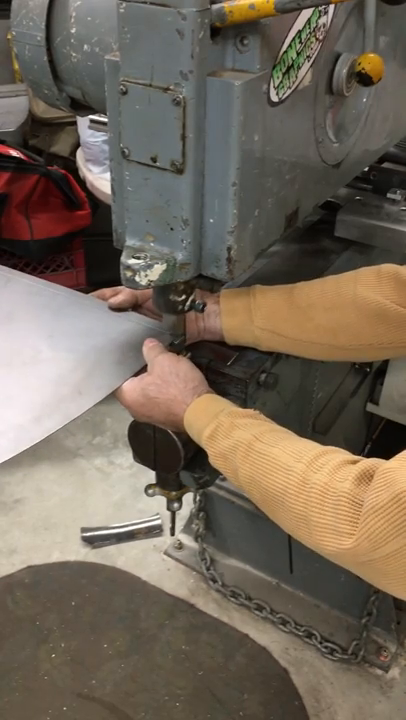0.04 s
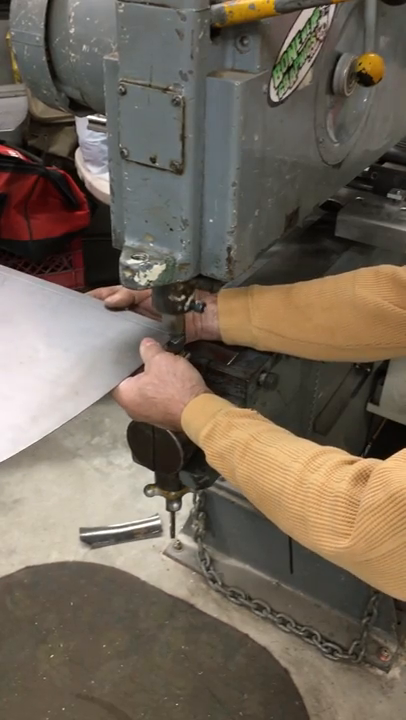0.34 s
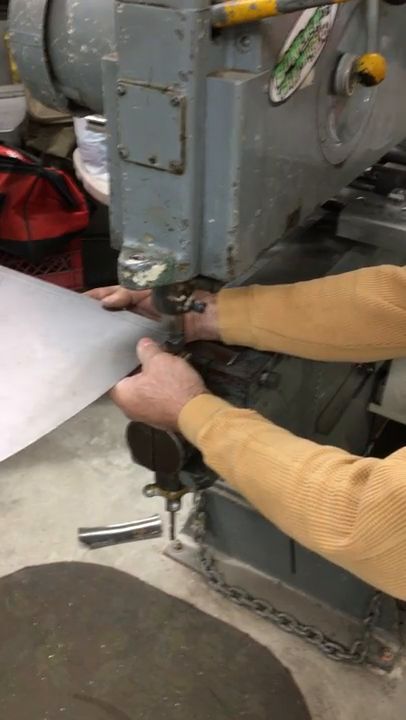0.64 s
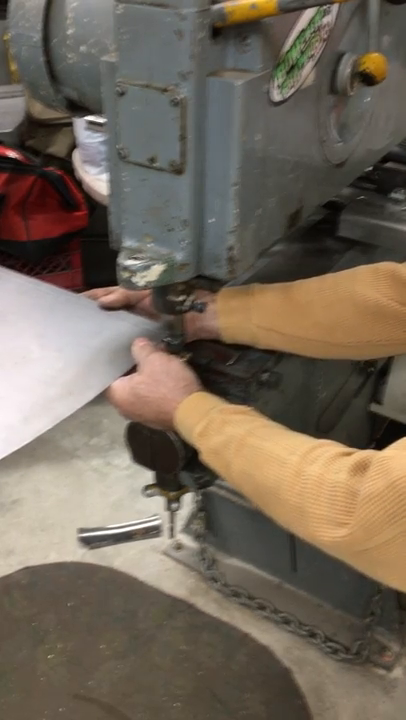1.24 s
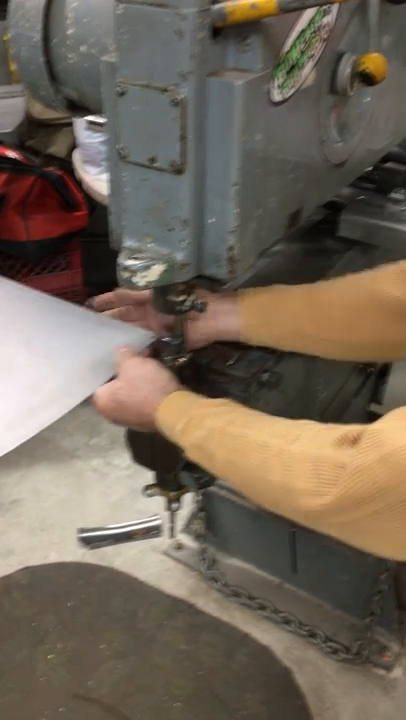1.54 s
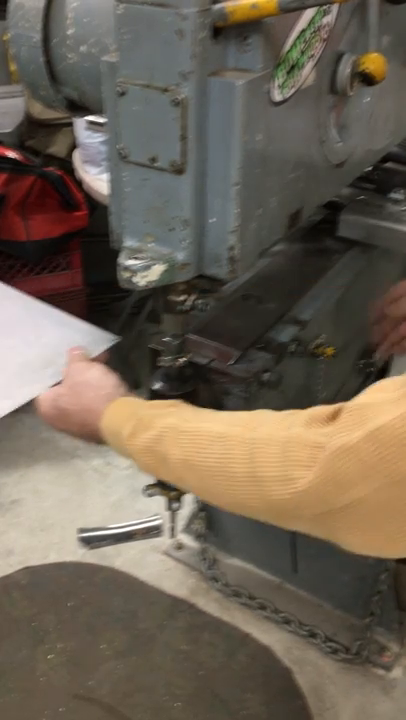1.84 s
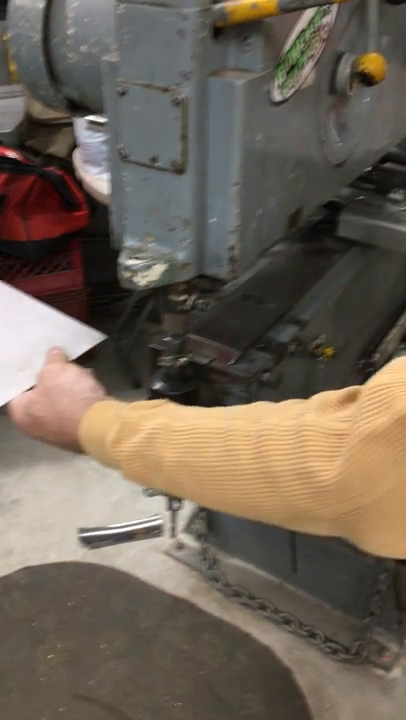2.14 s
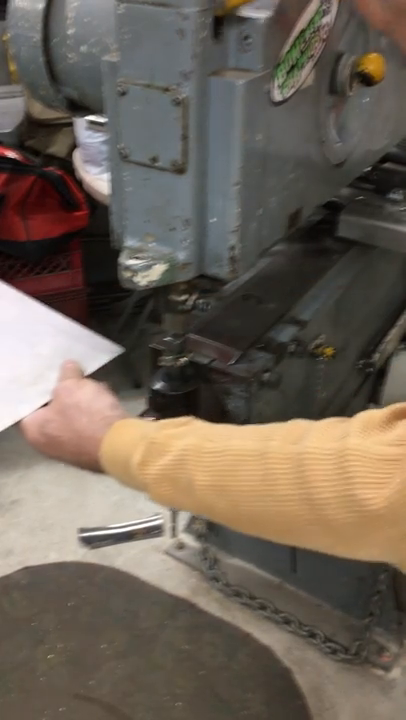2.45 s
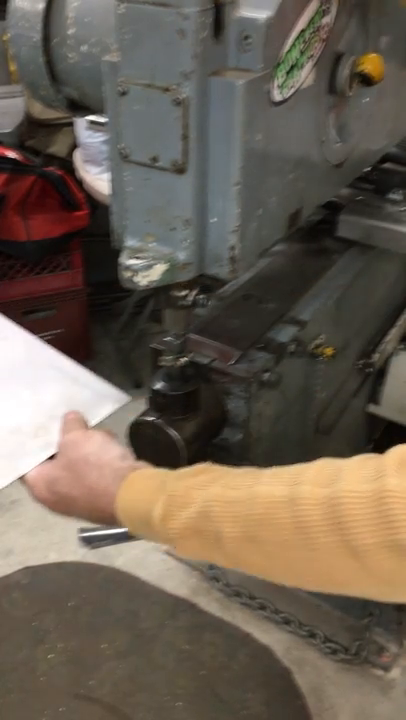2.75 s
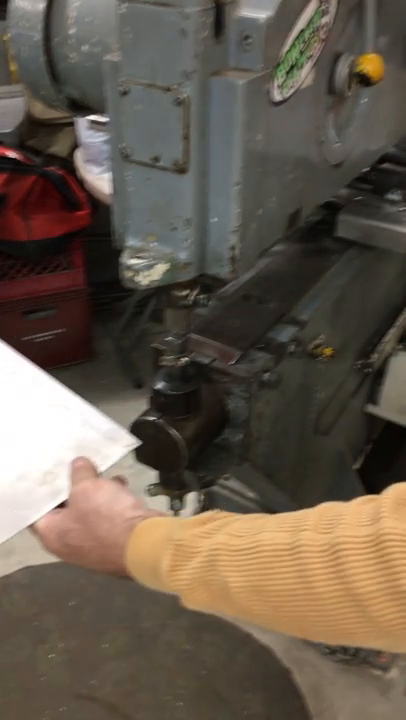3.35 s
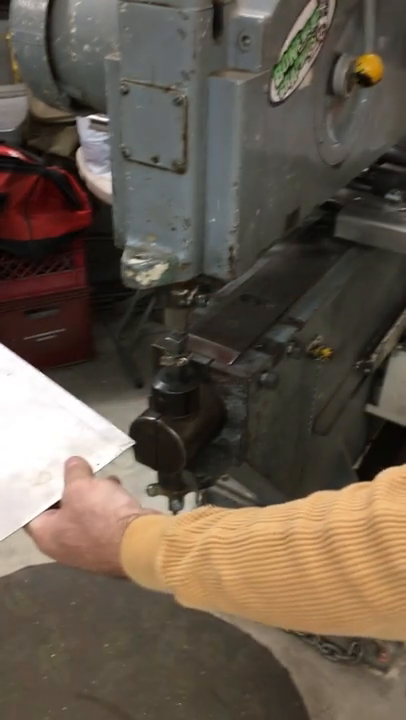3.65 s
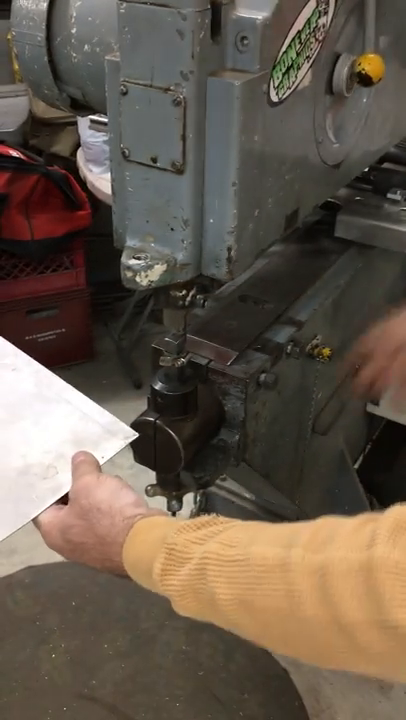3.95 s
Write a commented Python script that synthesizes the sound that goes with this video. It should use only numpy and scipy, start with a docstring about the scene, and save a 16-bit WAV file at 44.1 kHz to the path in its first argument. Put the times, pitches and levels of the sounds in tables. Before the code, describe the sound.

A metal-forming machine hammers very rapidly on a droning, rattling metal sheet in a workshop. The hammering fades to a quiet motor hum and hiss, then the free tool clatters and buzzes until a sharp knock near the end.

```python
"""A metal-forming machine runs at thirty strokes a second in a workshop, over its motor's hum and hiss.
First its tool hammers a sheet panel, which drones and rattles less and less as it is drawn out.
From 1.4 s the machine idles. At 2.4 s the free tool starts to clatter and makes the frame buzz,
and a few dull bumps follow. After one sharp knock at 3.6 s the motor coasts down and its hum stops."""
import sys
import numpy as np
from scipy import signal
from scipy.fft import rfft, irfft
from scipy.io import wavfile

SR = 44100
rng = np.random.default_rng(int(sys.argv[2]) if len(sys.argv) > 2 else 0)


def waveform_to_disk(signal):
    """Save audio, clipped to [-1, 1], as 16-bit WAV at the path in sys.argv[1]."""
    frames = np.transpose(np.atleast_2d(signal))
    scaled = np.clip(frames, -1, 1) * 32767
    samples = np.round(scaled).astype(np.int16)
    wavfile.write(sys.argv[1], SR, samples)


N = 176400
TIME = np.arange(N) / SR
CUTOFF_HZ = 15900


def amp(db):
    """Turn decibels into a gain to multiply by."""
    return 10 ** (np.asarray(db) / 20)


def unit(x):
    """Scale a sound to an average (rms) size of 1."""
    return x / np.sqrt(np.mean(x ** 2) + 1e-20)


def curve(rows, times=TIME):
    """Join a table's (time, value) points with straight lines."""
    return np.interp(times, *np.transpose(rows))


def level_at(spectrum, hz):
    """Read a spectrum's level in dB at the given frequencies."""
    points_hz, db = np.transpose(spectrum)
    return np.interp(np.log(hz + 1e-3), np.log(points_hz), db)


def colour(x, spectrum, peaks=()):
    """Give a sound a broad tone colour and narrow peaks or dips; white noise keeps about its power."""
    size = 2 * N
    hz = np.arange(N + 1) * SR / size
    peaks_db = sum(lift / (1 + ((hz - centre) / width) ** 2) for centre, width, lift in peaks)
    gain = amp(level_at(spectrum, hz) + peaks_db)
    gain /= np.sqrt(np.mean(gain ** 2 * (hz < CUTOFF_HZ)))
    # make the filter ring after each hit, never before it
    cepstrum = irfft(np.log(gain))[:N]
    cepstrum[1:] *= 2
    return irfft(rfft(x, size) * np.exp(rfft(cepstrum, size)))[:N]


def grit(count, spread_db):
    """Rough noise: a crowd of tiny impacts of uneven size."""
    noise = rng.standard_normal(count)
    sizes = amp(spread_db * np.clip(rng.standard_normal(count), -2, 2))
    return unit(noise * sizes)


def hits(times, levels_db, contacts, crack_s, tail_s, tail_db, alike):
    """Each hit is a few cracks and a fading tail; `alike` (0-1) is the share of noise all hits repeat."""
    t = TIME[:SR // 6]
    power = amp(2 * tail_db) * np.exp(-2 * t / tail_s)
    for delay, db in contacts:
        power += amp(2 * db) * (t >= delay) * np.exp(-2 * abs(t - delay) / crack_s)
    repeated = np.sqrt(alike) * rng.standard_normal(len(t))
    out = np.zeros(N + SR)
    for time, db in zip(times, levels_db):
        start = int(time * SR)
        fresh = np.sqrt(1 - alike) * grit(len(t), spread_db=3)
        out[start:start + len(t)] += amp(db) * np.sqrt(power) * (repeated + fresh)
    return out[:N]


# how fast the crank turns: (time [s], speed [strokes/s])
CRANK_SPEED = [(0, 29.9), (1.2, 29.9), (1.4, 29.96), (3.595, 29.96), (4, 25.87)]

def crank():
    """Count the crank's turns so far; one turn is one stroke of the tool."""
    return np.cumsum(curve(CRANK_SPEED)) / SR


def each_stroke(turns, point):
    """The times at which the crank passes one point (0-1) of its turn."""
    return np.interp(np.arange(int(turns[-1] - point) + 1) + point, turns, TIME)


def stroke_vibration(turns, spectrum, count=170, size=8192):
    """A vibration that repeats with every stroke, built from multiples of the stroke rate."""
    multiples = np.arange(count)
    strengths = (multiples > 1) * amp(level_at(spectrum, multiples * CRANK_SPEED[0][1]))
    phases = np.exp(2j * np.pi * rng.random(count))
    one_stroke = unit(irfft(strengths * phases, size))
    return np.interp(turns % 1, np.arange(size) / size, one_stroke)


def swell(turns, point, hz, swell_s):
    """A note that swells and dies once on every stroke, never quite equally."""
    times = each_stroke(turns, point)
    kicks = np.zeros(N)
    kicks[(times * SR).astype(int)] = amp(.5 * rng.standard_normal(len(times)))
    t = TIME[:SR // 8]
    note = t / swell_s * np.exp(1 - t / swell_s) * np.sin(2 * np.pi * hz * t)
    return signal.fftconvolve(kicks, note)[:N]


def workshop_echo(x, fade_s=0.21, level_db=-9.5):
    """The room answers with a short wash of echoes that falls 60 dB in `fade_s`."""
    t = TIME[:SR // 2]
    tail = rng.standard_normal(len(t)) * amp(-60 * t / fade_s) * (t > .006)
    return amp(level_db) * signal.fftconvolve(x, tail / np.sqrt(np.sum(tail ** 2)))[:N]


# tones of the drive's whine: (pitch [x stroke rate], level [dB])
WHINE_TONES = [(7, -85), (14, -72.5), (22, -82), (28, -78), (35, -78)]
# one tone of the frame that swells under the clatter: (time [s], level [dB])
FRAME_TONE_LEVEL = [(2.75, -92), (3.0, -67.5), (3.6, -67), (3.7, -90)]
# hum of the mains power: (time [s], level [dB])
HUM_LEVEL = [(0, -86), (.35, -96), (.6, -81), (.9, -76), (3.72, -74.5), (3.8, -100)]
# tone colour of the running gear's hiss: (frequency [Hz], level [dB])
HISS_COLOUR = [(90, -23.5), (300, -14.5), (520, -17.5), (1000, -10.5), (2100, -11), (3000, -14.5),
               (4800, -12.5), (5700, -6.5), (7600, -4.5), (8800, 1.5), (11500, -3), (15800, -8)]
# where the running gear rings: (frequency [Hz], width [Hz], boost [dB])
GEAR_PEAKS = [(3655, 36, 7), (4210, 45, 6.5), (13100, 220, 8)]

def motor(turns):
    """The drive whines, the frame sings, the mains hums at 60 Hz and the running gear hisses."""
    def tone(multiple):
        return np.sqrt(2) * np.sin(2 * np.pi * (multiple * turns + rng.random()))
    coasting_s = np.maximum(TIME - CRANK_SPEED[-2][0], 0)
    whine = sum(amp(db) * tone(round(multiple)) for multiple, db in WHINE_TONES)
    whine *= amp(-220 * coasting_s)  # dies quickly once the motor coasts
    hum = amp(curve(HUM_LEVEL)) * np.sqrt(2) * np.sin(2 * np.pi * 60 * TIME)
    hiss = amp(-51) * colour(grit(N, spread_db=4), HISS_COLOUR, GEAR_PEAKS)
    frame_tone = amp(curve(FRAME_TONE_LEVEL)) * tone(multiple=30)
    return whine + frame_tone + hum + hiss


# notes of the linkage: (point in the turn [0-1], pitch [Hz], swell time [s], level [dB])
LINKAGE_NOTES = [(0.23, 854, 0.0018, -62), (0.73, 862, 0.0018, -63.5), (0.37, 1022.0, 0.0033, -60),
                 (0.74, 1030.0, 0.0031, -62.5)]
# how loud they are together: (time [s], level [dB])
LINKAGE_LEVEL = [(2.45, -1), (2.6, -6), (4, -6)]

def linkage(turns):
    """The rods that move the tool flutter twice a stroke, making a soft whirr."""
    whirr = sum(amp(db) * swell(turns, point, hz, swell_s) for point, hz, swell_s, db in LINKAGE_NOTES)
    return amp(curve(LINKAGE_LEVEL)) * whirr


# how loud the frame buzzes: (time [s], level [dB])
BUZZ_LEVEL = [(2.42, -79), (2.5, -64), (2.66, -56.5), (4, -59.5)]
# tone colour of the buzz: (frequency [Hz], level [dB])
BUZZ_COLOUR = [(200, -22.5), (550, -18), (780, -1.5), (1100, -9.5), (1280, 1.5), (1480, -1.5), (1700, 3.5),
               (2020, 4), (2500, -5), (3200, -3.5), (4500, -14.5)]
CLATTER_POINT = .215  # where in each turn the free tool strikes

def frame_buzz(turns, jolt_height=0.54, jolt_fade_turns=0.098):
    """The frame buzzes under the free tool and gets a jolt from each of its taps."""
    regular = 0.67 * stroke_vibration(turns, BUZZ_COLOUR)
    rough = 0.62 * colour(grit(N, spread_db=8.5), BUZZ_COLOUR)
    turns_since_tap = (turns - CLATTER_POINT) % 1
    jolt = 1 + jolt_height * np.exp(-turns_since_tap / jolt_fade_turns)
    return unit((regular + rough) * jolt) * amp(curve(BUZZ_LEVEL)) * (TIME > BUZZ_LEVEL[0][0])


# quick hits that blend into one sharp knock: (time [s], level [dB])
KNOCK_HITS = [(3.5943, -28.5), (3.5966, -27), (3.5996, -25), (3.604, -28), (3.614, -44)]
# tone colour of the knock: (frequency [Hz], level [dB])
KNOCK_COLOUR = [(200, -40), (600, -33), (1500, -9), (3000, -11), (4600, -1.5), (5800, 2.5), (8500, 3),
                (10300, 6), (11800, 5.5), (14000, -3), (15800, -12)]
# dull bumps: (time [s], level [dB])
BUMP_HITS = [(2.848, -63), (2.88, -60.5), (2.905, -63), (3.6, -63)]
# tone colour of a bump: (frequency [Hz], level [dB])
BUMP_COLOUR = [(80, -28), (380, 11), (600, 9), (4000, -24)]

def knocks():
    """Three dull bumps, then one sharp metal knock with a fourth bump under it."""
    sharp = hits(*np.transpose(KNOCK_HITS), contacts=[(0.00052, 0.0082)],
                 crack_s=0.0033, tail_s=0.014, tail_db=-12.5, alike=0.26)
    dull = hits(*np.transpose(BUMP_HITS), contacts=[(0.0028, 0.0078)],
                crack_s=0.0054, tail_s=0.035, tail_db=-6.5, alike=0.24)
    return colour(sharp, KNOCK_COLOUR) + colour(dull, BUMP_COLOUR)


# how loud the free tool clatters: (time [s], level [dB])
CLATTER_LEVEL = [(2.42, -65), (2.5, -43), (2.58, -36.5), (2.72, -35), (2.81, -36.5), (3.5, -37.5),
                 (3.98, -36.5)]
# bounces within one tap: (delay [s], level [dB])
TAP_BOUNCES = [(0, -1.5), (.002, -3), (0.014, -16), (0.023, -10.5)]
# tone colour of the clatter: (frequency [Hz], level [dB])
CLATTER_COLOUR = [(300, -22.5), (700, -18), (1300, -10.5), (1900, -1.5), (2500, -9.5), (3300, -8.5),
                  (4900, -16), (5600, -3), (8000, 1.5), (10400, -3.5), (11200, -2.5), (12800, -3),
                  (14000, -9), (15800, -25)]
# where the free tool rings: (frequency [Hz], width [Hz], boost at first [dB], boost once settled [dB])
FREE_TOOL_PEAKS = [(1268, 52, 19, 10.5), (1870, 150, 7, 1.5), (5640, 70, 7.5, -1), (6270, 90, 10, 1),
                   (7010, 50, 14.5, 11), (8130, 220, -2, 4.5), (11000, 160, 10, 10), (12500, 73, 10, 7)]

def tool_clatter(turns, settle_s=2.765):
    """With no sheet under it the tool shakes loose and taps each stroke; its ring changes as it settles."""
    times = each_stroke(turns, CLATTER_POINT)
    times = times[times > CLATTER_LEVEL[0][0]]
    levels_db = curve(CLATTER_LEVEL, times) + .8 * rng.standard_normal(len(times))
    taps = hits(times, levels_db, TAP_BOUNCES, crack_s=0.002, tail_s=0.021, tail_db=-11.5, alike=0.46)
    early_peaks = [(hz, width, boost) for hz, width, boost, _ in FREE_TOOL_PEAKS]
    settled_peaks = [(hz, width, boost) for hz, width, _, boost in FREE_TOOL_PEAKS]
    early = colour(taps * (TIME < settle_s), CLATTER_COLOUR, early_peaks)
    settled = colour(taps * (TIME >= settle_s), CLATTER_COLOUR, settled_peaks)
    return early + settled


# how loud the panel rattles; its drone follows this too: (time [s], level [dB])
RATTLE_LEVEL = [(0, -35.5), (.32, -37), (.45, -41.5), (.7, -44.5), (.95, -49), (1.12, -56.5), (1.4, -66.5)]
# tone colour of the rattle: (frequency [Hz], level [dB])
RATTLE_COLOUR = [(100, -33), (600, -15.5), (1500, -5), (2500, -7), (4000, -4), (5300, -2.5), (6500, 0.5),
                 (8700, 2), (10500, -1), (13000, -6.5), (15800, -4)]

def panel_rattle():
    """The sheet rattles against the die, the metal block under it, less and less."""
    rattle = grit(N, spread_db=4) * amp(curve(RATTLE_LEVEL))
    return colour(rattle, RATTLE_COLOUR, peaks=[(4785, 67, 9.2)])


# the panel's own notes: (point in the turn [0-1], pitch [Hz], swell time [s], level in grip 0, 1, 2 [dB])
PANEL_NOTES = [(0.71, 168.5, 0.0057, -55, -57.5, -62.5), (0.57, 231.5, 0.012, -62.5, -64.5, -65.5),
               (0.95, 403, 0.0031, -48.5, -53, -59.5), (0.79, 672.0, 0.0059, -53, -56, -66.5),
               (0.81, 847, 0.0016, -47, -48.5, -52.5), (0.49, 850, 0.0014, -48.0, -45, -52),
               (0.22, 1004, 0.00095, -45.5, -58.0, -52), (0.53, 1038.0, 0.0046, -46.5, -57.0, -52.0),
               (0.9, 1440.0, 0.0031, -40.5, -43, -50.0), (0.39, 1442, 0.0011, -39.5, -43.5, -46.5),
               (0.77, 1476.0, 0.0052, -43, -43.5, -50), (0.41, 1508, 0.001, -40.5, -39.5, -47),
               (0.95, 1718.0, 0.0064, -47.5, -52, -58.5)]
# the hands shift the panel through three positions: (time [s], grip [0-2])
GRIP_POSITION = [(.3, 0), (.39, 1), (.68, 1), (.75, 2)]
# how hard the low notes are driven: (time [s], level [dB])
LOW_NOTE_LEVEL = [(.7, -1), (1.0, -1), (1.2, -6.5), (1.7, -37)]
# the high notes and broad drone, which drop out as the grip shifts: (time [s], level [dB])
RING_LEVEL = [(0, 0), (.55, 0.5), (.71, -11.5), (.75, 2), (1.03, -2), (1.1, -15), (1.4, -50)]
# tone colour of the broad drone: (frequency [Hz], level [dB])
DRONE_COLOUR = [(80, -28), (300, -4.5), (2200, 4), (5000, -12)]
# smooth tones within the drone: (pitch [x stroke rate], starting level [dB])
DRONE_TONES = [(11, -62), (18, -62)]

def panel_drone(turns, high_above_hz=800):
    """The sheet flexes on every stroke, so it drones and rings; its ring changes with the grip."""
    low_gain, ring_gain = amp(curve(LOW_NOTE_LEVEL)), amp(curve(RING_LEVEL))
    grip, rattle_db = curve(GRIP_POSITION), curve(RATTLE_LEVEL)
    out = amp(rattle_db - 18) * stroke_vibration(turns, DRONE_COLOUR) * ring_gain
    for point, hz, swell_s, *levels_db in PANEL_NOTES:
        note = swell(turns, point, hz, swell_s) * amp(np.interp(grip, [0, 1, 2], levels_db))
        out += note * (ring_gain if hz > high_above_hz else low_gain)
    fade_db = rattle_db - rattle_db[0]
    for multiple, db in DRONE_TONES:
        out += amp(db + fade_db) * np.sin(2 * np.pi * round(multiple) * turns)
    return out


# how hard the tool strikes: (time [s], level [dB])
BLOW_LEVEL = [(0, -26.5), (.25, -24.5), (.42, -25.5), (.56, -24.5), (.72, -26.5), (.9, -27.5),
              (1.05, -29.5), (1.22, -31), (1.31, -35), (1.36, -64)]
# bounces within one blow: (delay [s], level [dB])
BLOW_BOUNCES = [(0, -8), (.001, -1.5), (.003, -3.5), (.006, -5)]
# tone colour of a blow: (frequency [Hz], level [dB])
BLOW_COLOUR = [(500, -28), (2000, -21.5), (4800, -23), (6500, -11.5), (8000, -12), (9300, 0.5), (10400, -5),
               (11500, -0.5), (13500, -1), (15800, -5)]
# where the striking tool rings: (frequency [Hz], width [Hz], boost [dB])
TOOL_PEAKS = [(9570, 63, 5), (10920, 76, 9), (12000, 73, 8.5), (13550, 76, 9)]

def hammer(turns):
    """The steel tool strikes the sheet: one bright, bouncing blow on every stroke."""
    times = each_stroke(turns, point=.25)
    times = times[times < BLOW_LEVEL[-1][0]]
    levels_db = curve(BLOW_LEVEL, times) + 0.38 * rng.standard_normal(len(times))
    blows = hits(times, levels_db, BLOW_BOUNCES, crack_s=0.0013, tail_s=0.016, tail_db=-11, alike=0.47)
    return colour(blows, BLOW_COLOUR, TOOL_PEAKS)


def scene():
    """One crank sets the machine's rhythm; only the impacts echo in the room."""
    turns = crank()
    drone, rattle = panel_drone(turns), panel_rattle()
    clatter, buzz = tool_clatter(turns), frame_buzz(turns)
    impacts = hammer(turns) + rattle + clatter + knocks()
    return (impacts + workshop_echo(impacts) + drone + buzz + linkage(turns) + motor(turns))[None]


# narrow dips in the whole sound: (frequency [Hz], width [Hz], level change [dB])
TREBLE_DIPS = [(4900, 220, -6), (10450, 180, -3.5)]

def record(dry):
    """Two narrow dips colour everything, and the highest treble is cut steeply."""
    dipped = colour(dry[0], spectrum=[(1000, 0)], peaks=TREBLE_DIPS)[None]
    treble_cut = signal.ellip(12, .1, 80, CUTOFF_HZ, fs=SR, output="sos")
    return signal.sosfilt(treble_cut, dipped)


dry = scene()
out = record(dry)
waveform_to_disk(out)
```